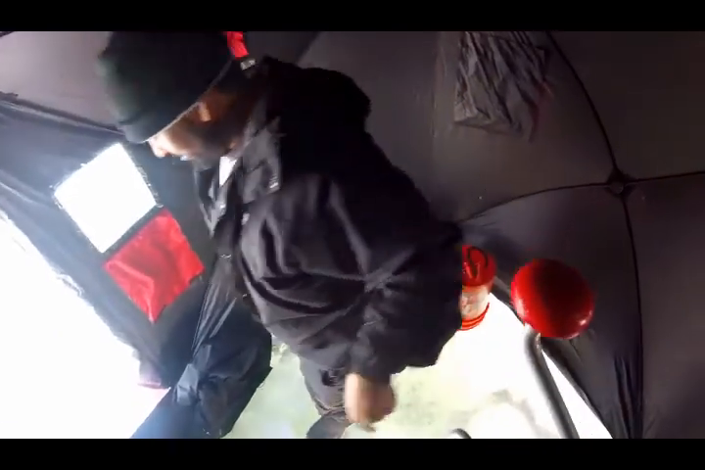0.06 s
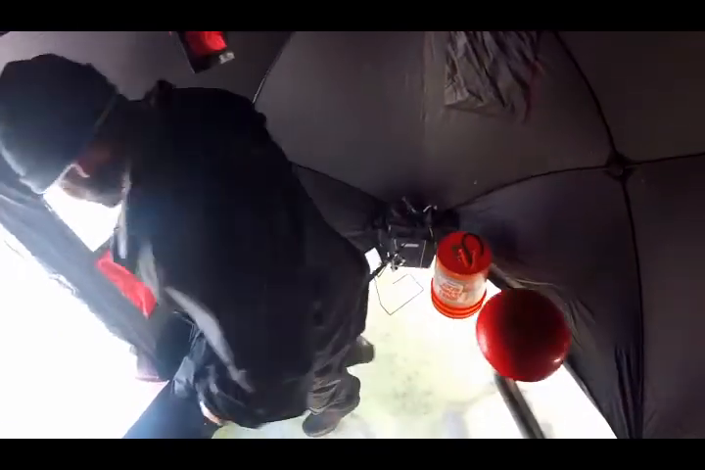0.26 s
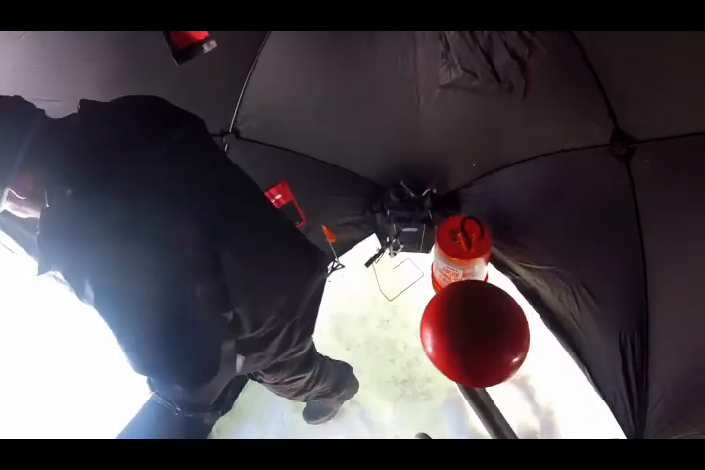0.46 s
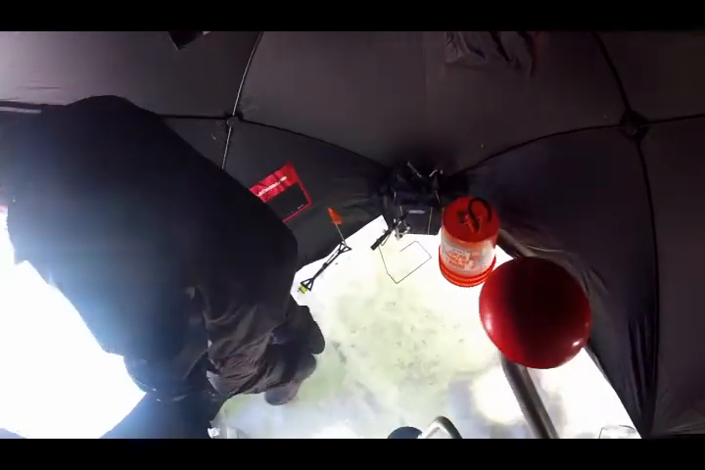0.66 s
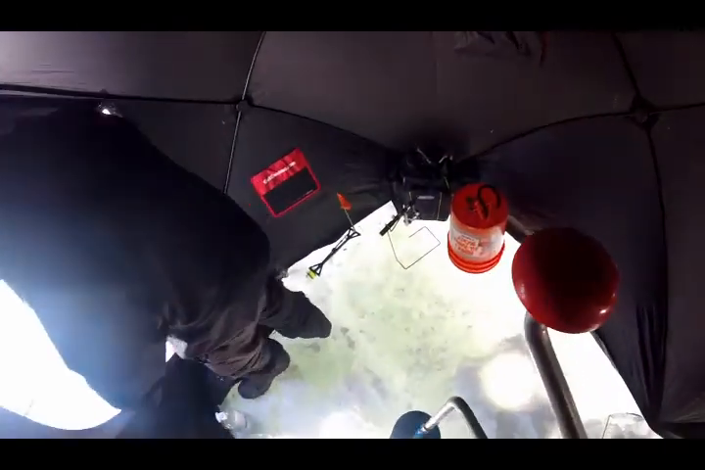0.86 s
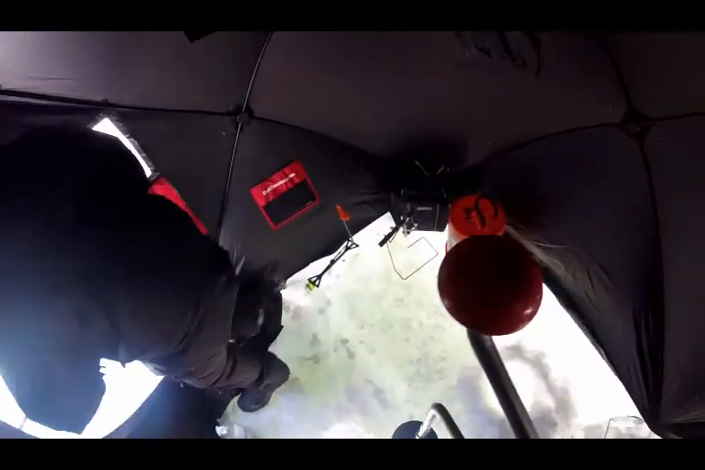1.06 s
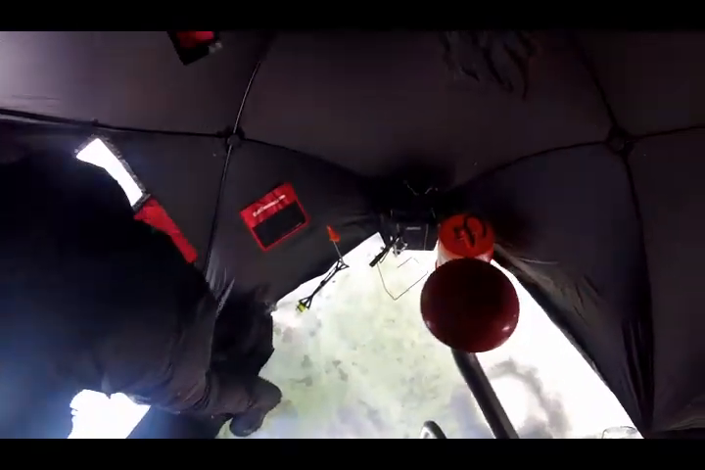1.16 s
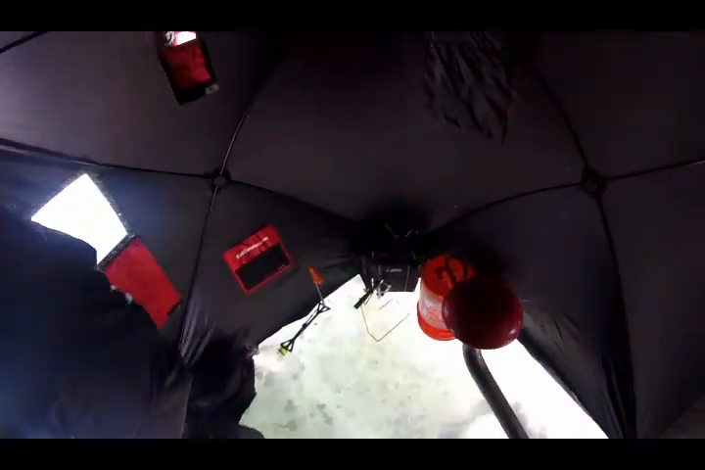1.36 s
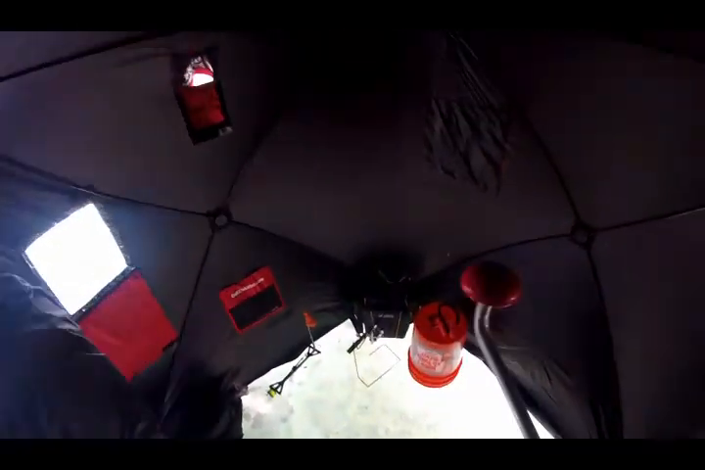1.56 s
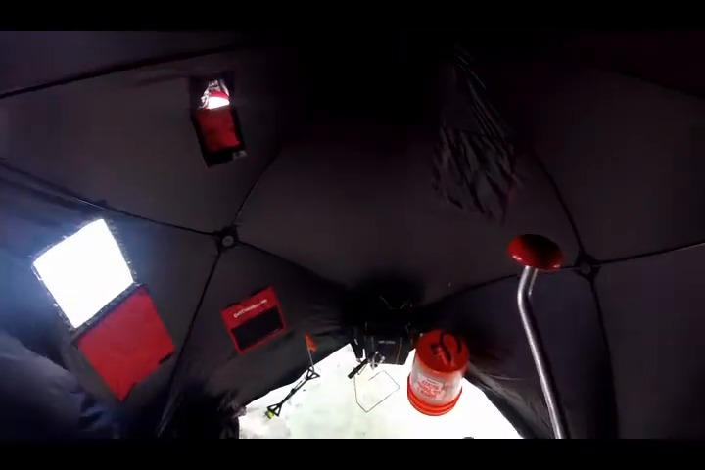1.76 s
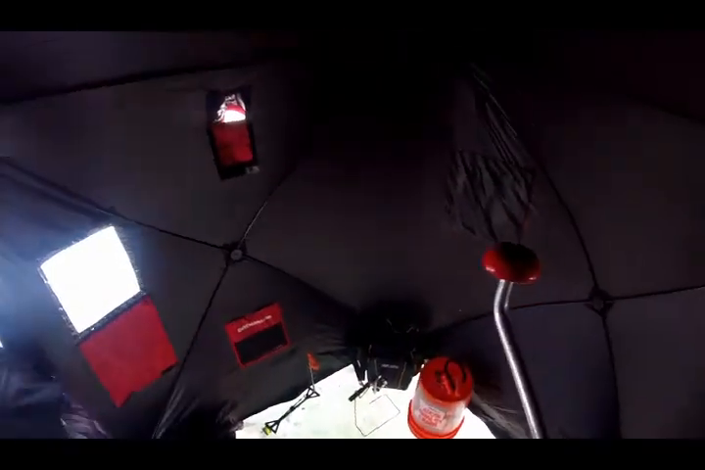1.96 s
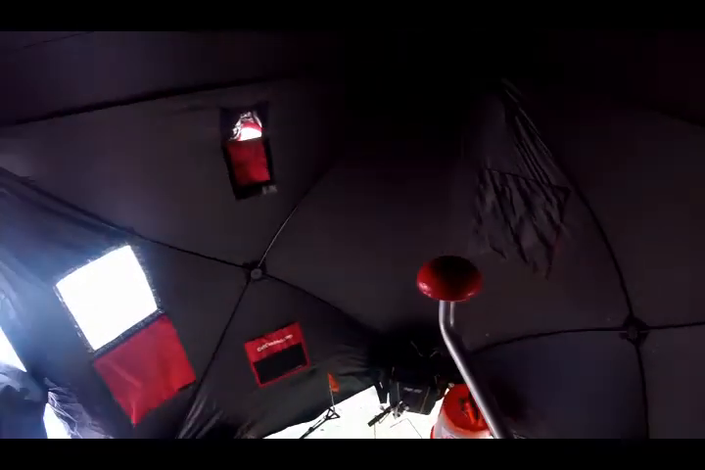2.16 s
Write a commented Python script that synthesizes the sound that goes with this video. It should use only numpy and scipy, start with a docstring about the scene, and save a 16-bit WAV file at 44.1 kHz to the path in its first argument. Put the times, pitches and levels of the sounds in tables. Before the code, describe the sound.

Hand auger grinding and scraping into ice in rough, uneven bursts inside a small tent

```python
"""Inside a small fabric shelter, a steel hand auger grinds and scrapes on ice close by, in uneven bursts.
Dense tiny slips make a hiss of shaved ice and shake the low body, the shaft and the ringing blades.
Catches are short decaying tones that give dull thumps; bites are bursts of chatter ringing the blades.
One bright crack is a burst of coloured slips; a short noise tail gives the shelter's dull reverb.
A quiet noise floor and a faint deep rumble lie underneath; both channels are the same."""
import sys
import numpy as np
from scipy import signal
from scipy.fft import rfft, irfft
from scipy.io import wavfile
from scipy.ndimage import uniform_filter1d

SR = 44100
rng = np.random.default_rng(int(sys.argv[2]) if len(sys.argv) > 2 else 0)


def put_to_file(sound):
    """Save the sound as 16-bit audio at rate SR, in the file named by the first command-line argument."""
    columns = np.atleast_2d(sound).T  # one column per channel
    safe = np.clip(columns, -1, 1)
    whole_steps = np.round(safe * 32767)
    wavfile.write(sys.argv[1], SR, whole_steps.astype(np.int16))


N = 97020  # length [samples], 2.2 s


def gain_of(db):
    """Amplitude factor for a level in dB."""
    return 10 ** (np.asarray(db) / 20)


def evened(x):
    """Scales a signal to an RMS of one."""
    return x / np.sqrt(np.mean(x ** 2) + 1e-20)


def colour(x, points):
    """Shapes x by a spectrum given in dB on a log-frequency axis."""
    f, db = np.transpose(points)
    hz = np.fft.rfftfreq(len(x), 1 / SR)
    curve_db = np.interp(np.log(hz + 1), np.log(f + 1), db)
    return irfft(rfft(x) * gain_of(curve_db), len(x))


def ring(x, modes):
    """Sums resonances of alternating sign, each filter applied twice."""
    out = np.zeros(len(x))
    for k, (hz, width_hz, db) in enumerate(modes):
        b, a = signal.iirpeak(hz, hz / width_hz, SR)
        once = signal.lfilter(b, a, x)
        out += (-1) ** k * gain_of(db) * signal.lfilter(b, a, once)
    return out


def slips(per_s, spread_db, lumps_db, lump_s):
    """Random stick-slip impulses of either sign, a few large, coming in lumps."""
    hit = (rng.random(N) < per_s / SR) * rng.choice([-1., 1.], N)
    size = gain_of(spread_db * np.minimum(rng.exponential(1, N), 4))
    span = max(int(lump_s * SR), 2)
    smooth = uniform_filter1d(rng.standard_normal(N), span)
    lumps = evened(uniform_filter1d(smooth, span))
    return hit * size * gain_of(lumps_db * lumps)


def focus(x, hz, width_hz, strength_db):
    """Lifts the resonances near a moving centre, as the grip and load shift, and evens the loudness."""
    turn = np.exp(2j * np.pi * np.cumsum(hz) / SR)
    r = np.exp(-np.pi * width_hz / SR)
    # Shift the centre down to 0 Hz, low-pass twice, then shift back.
    once = signal.lfilter([1 - r], [1, -r], x / turn)
    near = 2 * (turn * signal.lfilter([1 - r], [1, -r], once)).real
    near_even = near / np.sqrt(uniform_filter1d(near ** 2, size=1500) + 1e-12)
    out = evened(x) + gain_of(strength_db) * near_even
    return out / np.sqrt(uniform_filter1d(out ** 2, size=2500) + 1e-12)


def patchy(x, patch_db):
    """Brief random patches of stronger and weaker pitch regions."""
    z = signal.stft(x, nperseg=512)[2]
    noise = rng.standard_normal(z.T.shape)
    over_time = uniform_filter1d(noise, size=5, axis=0)
    patches = evened(uniform_filter1d(over_time, size=4, axis=1)).T
    return signal.istft(z * gain_of(patch_db * patches), nperseg=512)[1][:N]


def burst(rise_s, fall_s):
    """Envelope with an exponential rise and fall, set by their time constants."""
    t = np.arange(0, .12, 1 / SR)
    return (1 - np.exp(-t / rise_s)) * np.exp(-t / fall_s)


def add(mix, s, sound):
    """Lays a sound into the mix at a start time in seconds."""
    part = mix[round(s * SR):][:len(sound)]
    part += sound[:len(part)]


# Spectrum of the quiet floor: (frequency [Hz], relative level per Hz [dB])
FLOOR_SPECTRUM = [(20, -30), (110, -6), (160, 7.5), (700, 4.5), (3000, -6), (11000, -16.5)]
FLOOR_DB = -43  # RMS level


def quiet_floor():
    """Steady coloured noise under everything."""
    return gain_of(FLOOR_DB) * evened(colour(rng.standard_normal(N), FLOOR_SPECTRUM))


# Spectrum of the faint deep rumble: (frequency [Hz], relative level per Hz [dB])
DEEP_SPECTRUM = [(20, 3), (90, -7), (130, -23)]
DEEP_DB = -50.5  # gain before the loudness of the auger is applied


def deep_rumble(auger):
    """Low noise that swells with the smoothed power of the auger, in a compressed way."""
    loud = abs(uniform_filter1d(auger ** 2, size=3000)) ** 0.36
    return gain_of(DEEP_DB) * loud * evened(colour(rng.standard_normal(N), DEEP_SPECTRUM))


TENT_T60_S, TENT_DB = 0.11, -14  # time to fall by 60 dB, gain of the reverb


def tent(x):
    """Short dull tail of the fabric shelter: decaying noise convolved with the sound."""
    t = np.arange(0, .15, 1 / SR)
    tail = rng.standard_normal(len(t)) * gain_of(-60 * t / TENT_T60_S) * (t > .003)
    return signal.oaconvolve(x, tail / np.linalg.norm(tail))[:N]


# Spectrum of splintering ice: (frequency [Hz], relative level per Hz [dB])
CRACK_SPECTRUM = [(400, -13), (800, -1.5), (1700, -7), (3800, 1), (6500, -14), (10500, -20)]
CRACK_S, CRACK_DB = .2, -11.5  # start, gain of the burst
CRACK_RISE_S, CRACK_FALL_S = 0.0029, 0.017  # time constants


def crack():
    """One bright splintering burst, made of dense coloured slips."""
    shape = np.zeros(N)
    add(shape, CRACK_S, gain_of(CRACK_DB) * burst(CRACK_RISE_S, CRACK_FALL_S))
    return shape * evened(colour(slips(7000, 2.3, 1.2, 0.0026), CRACK_SPECTRUM))


# Catches: (time [s], low push level [dB], low pitch [Hz], twice the rise to the peak [cycles],
#           upper knock level [dB], upper pitch [Hz])
CATCHES = [(0.197, -16.5, 215, 0.44, -32, 540), (0.247, -13, 266, 0.83, -21, 536),
           (0.338, -22, 187, 2.8, -23, 640), (0.361, -12, 321, 4.4, -53, 398),
           (0.577, -20, 198, 1.14, -18, 570), (0.777, -21.5, 197, 1.1, -14, 567),
           (0.865, -3.5, 340, 0.44, -22, 513), (0.903, -12, 307, 1.7, -12, 550),
           (0.921, -17, 340, 0.64, -34, 573), (1.476, -32, 190, 0.67, -30.5, 560),
           (1.643, -12.5, 223, 1.02, -14.5, 480), (1.662, -11, 237, 1.74, -15.5, 484),
           (1.697, -22, 232, 1.2, -17.5, 470), (1.716, -20, 270, 1.04, -26, 536),
           (1.743, -25.5, 236, 2, -33.5, 414), (1.9, -20, 160, 0.38, -37, 684),
           (1.959, -23, 264, 1.8, -22, 441)]
THUMP_RING_DB = -15  # gain of the body and shaft ringing after each catch


def thumps():
    """Each catch is a short low push with a higher knock; both ring the body and shaft."""
    out = np.zeros(N)
    for s, push_db, push_hz, cycles, knock_db, knock_hz in CATCHES:
        t = np.arange(0, 4 * cycles / push_hz, 1 / SR)
        u = 2 * t * push_hz / cycles
        envelope = np.e * u * np.exp(-u)  # reaches one at u = 1
        push = gain_of(push_db) * np.sin(2 * np.pi * push_hz * t)
        knock = gain_of(knock_db) * np.sin(2 * np.pi * knock_hz * t)
        add(out, s, envelope * (push + knock))
    return out + gain_of(THUMP_RING_DB) * ring(out, BODY_MODES + SHAFT_MODES)


# Blade bites: (time [s], burst level [dB], fall time constant [s])
BITES = [(0.082, -24, 0.053), (0.346, -13.5, 0.048), (0.385, -12.5, 0.013), (0.458, -9, 0.03),
         (0.623, -9, 0.02), (0.671, -11, 0.049), (0.707, -14.5, 0.031), (0.734, -9, 0.045),
         (0.897, -13, 0.024), (1.39, -22, 0.027), (1.474, -24.5, 0.013), (1.503, -16.5, 0.06),
         (1.588, -11, 0.012), (1.647, -14, 0.027), (1.713, -23.5, 0.012)]
BITE_RISE_S = 0.0027  # time constant


def bites():
    """Short bursts of chatter that ring the blades, with a little bare rasp."""
    shape = np.zeros(N)
    chatter = slips(4000, 0.47, 0.17, 0.001)
    for s, db, fall_s in BITES:
        add(shape, s, gain_of(db) * burst(BITE_RISE_S, fall_s))
    bare_rasp = gain_of(-15) * evened(colour(chatter, HISS_SPECTRUM))
    rasp = blade_ring(chatter) + bare_rasp
    return shape * rasp / np.percentile(abs(rasp), 95)


# Scraping curve: (time [s], hiss level [dB], rumble level [dB], shaft tone level [dB],
#                  blade ring level [dB], rumble centre [Hz], shaft tone centre [Hz])
SCRAPE = [(0.0, -47, -53, -50, -38.5, 260, 736), (0.09, -38, -41, -42.5, -76, 191, 745),
          (0.171, -41, -45, -46, -48, 203, 640), (0.212, -25, -35.5, -47, -44, 230, 554),
          (0.26, -28, -22, -23, -29, 240, 607), (0.29, -37, -55, -49, -43, 230, 703),
          (0.321, -33.5, -74, -58, -41, 292, 700), (0.342, -32.5, -25.5, -37, -40, 310, 570),
          (0.371, -22.5, -23, -40, -29, 348, 543), (0.421, -22.5, -30, -25, -22, 290, 594),
          (0.47, -23, -26.5, -24.5, -26, 300, 610), (0.512, -18.5, -23, -25.5, -19, 211, 596),
          (0.56, -24.5, -37, -49, -29, 222, 569), (0.589, -19, -22.5, -25, -26, 265, 515),
          (0.73, -22, -23, -21.5, -29.5, 215, 616), (0.781, -21, -15.5, -20.5, -24.5, 249, 538),
          (0.831, -23.5, -15, -22.5, -22, 182, 582), (0.88, -27, -35, -22, -31.5, 289, 478),
          (0.92, -21, -18, -23.5, -22, 310, 584), (0.977, -33.5, -38.5, -28, -57, 280, 574),
          (1.0, -39, -60, -75, -66, 223, 584), (1.05, -58, -56, -77, -74, 235, 485),
          (1.09, -48, -46, -58, -67, 200, 645), (1.168, -33, -36, -41, -55, 204, 510),
          (1.271, -38, -48, -41.5, -44, 262, 740), (1.33, -51, -55, -74, -54, 257, 530),
          (1.412, -51, -45, -39, -43, 242, 775), (1.45, -49, -53, -60, -60, 214, 656),
          (1.509, -44, -35, -47, -31, 227, 700), (1.582, -29.5, -24, -37, -32.5, 237, 510),
          (1.63, -31, -39, -54, -32, 209, 524), (1.66, -36.5, -49, -30, -37.5, 218, 444),
          (1.73, -32, -40, -40.5, -28.5, 252, 494), (1.809, -36.5, -37.5, -52, -41, 174, 626),
          (1.859, -41, -44, -46, -41.5, 205, 710), (1.971, -39, -39, -39.5, -40, 276, 466),
          (2.03, -43, -46.5, -63, -53, 214, 600), (2.14, -37.5, -35.5, -43, -39.5, 225, 663),
          (2.2, -39, -44.5, -52, -37, 197, 576)]


def track(column):
    """One column of the scraping curve, sample by sample."""
    rows = np.array(SCRAPE)
    return np.interp(np.arange(N) / SR, rows[:, 0], rows[:, column])


def level(column):
    """One level column of the scraping curve as an amplitude factor."""
    return gain_of(track(column))


# Spectrum of shaved ice: (frequency [Hz], relative level per Hz [dB])
HISS_SPECTRUM = [(880, -11.5), (1600, -9.5), (2150, -11), (3510, -11.5), (7560, -24.5), (10200, -28),
                 (11000, -33.5)]


def ice_hiss(fine):
    """Fine slips coloured into the hiss of shaved ice, with patchy pitch regions."""
    return evened(patchy(colour(fine, HISS_SPECTRUM), patch_db=2.1)) * level(column=1)


# Low body resonances: (frequency [Hz], filter width per pass [Hz], relative level [dB])
BODY_MODES = [(171.8, 70, 4.5), (249.4, 54, -4), (337.4, 107, 0.5)]


def body_rumble(coarse):
    """Coarse slips shake the low body, with a moving emphasis."""
    rung = ring(coarse, BODY_MODES)
    return focus(rung, track(column=5), width_hz=100, strength_db=-2.9) * level(column=2)


# Shaft resonances: (frequency [Hz], filter width per pass [Hz], relative level [dB])
SHAFT_MODES = [(461, 106, 5), (571, 66, -0.5), (698, 215, 0.5)]


def shaft_tone(coarse):
    """The same coarse slips ring the shaft, with a narrow moving emphasis."""
    rung = ring(coarse, SHAFT_MODES)
    return focus(rung, track(column=6), width_hz=27.6, strength_db=2.2) * level(column=3)


# Blade resonances: (frequency [Hz], filter width per pass [Hz], relative level [dB])
BLADE_MODES = [(830, 63, -5), (979, 206, 3), (1102.4, 26, -5), (1215.4, 180, 1), (1369, 120, 3),
               (1823, 970, -5.5)]
# Strongest pitch region of the blade rasp: (time [s], centre [Hz])
BLADE_CENTRE = [(.35, 1120), (.46, 1135), (.54, 1170), (.6, 1130), (.68, 1246), (.75, 1130), (.8, 1064),
                (.85, 1210), (.9, 1103), (1.4, 1143), (1.52, 1164), (1.75, 1123)]


def blade_ring(x):
    """Slips ring the blade resonances, with an emphasis that drifts in pitch."""
    centre_hz = np.interp(np.arange(N) / SR, *np.transpose(BLADE_CENTRE))
    return focus(ring(x, BLADE_MODES), centre_hz, width_hz=163, strength_db=0.3)


def grind():
    """Hiss of shaved ice and the three ringing parts, all shaken by slips."""
    fine = slips(7500, 2.07, 0.85, 0.0089)
    coarse = slips(1500, 2.8, 0.55, 0.0093)
    mid = slips(2500, 1.6, 0.48, 0.0017)
    blades = blade_ring(mid) * level(column=4)
    return ice_hiss(fine) + body_rumble(coarse) + shaft_tone(coarse) + blades


LOW_CUT_HZ = 136.7


def scene():
    """The auger in the shelter, bass cut, over a quiet floor and deep rumble; same in both channels."""
    auger = grind() + thumps() + bites() + crack()
    sheltered = auger + gain_of(TENT_DB) * tent(auger)
    low_cut = signal.butter(8, LOW_CUT_HZ, 'high', fs=SR, output='sos')
    near = signal.sosfiltfilt(low_cut, sheltered)
    return np.tile(near + quiet_floor() + deep_rumble(auger), (2, 1))


CEILING, EDGE_HZ = 0.86, 11200  # soft limit of the amplitude, top of the band


def record(dry):
    """Soft ceiling on loud swings, then the band limit."""
    soft = CEILING * np.tanh(dry / CEILING)
    low_pass = signal.firwin(511, EDGE_HZ, window=("kaiser", 9), fs=SR)
    return signal.oaconvolve(soft, low_pass[None], "same")


dry = scene()
out = record(dry)
put_to_file(out)
```